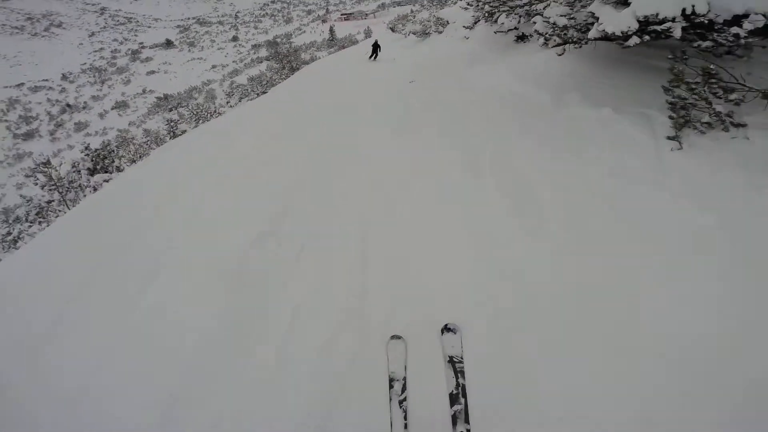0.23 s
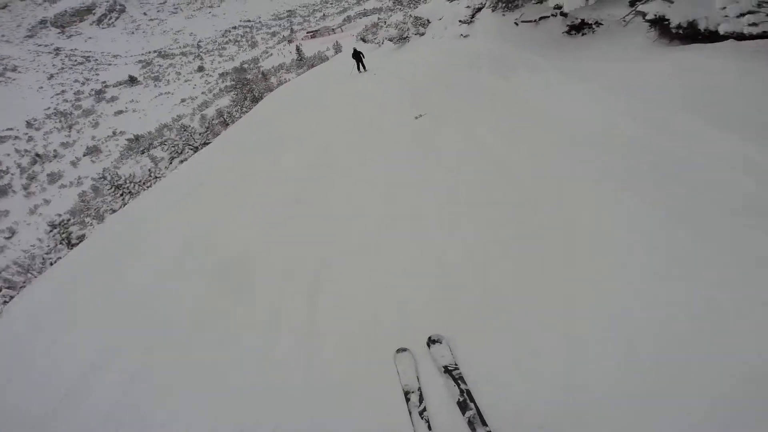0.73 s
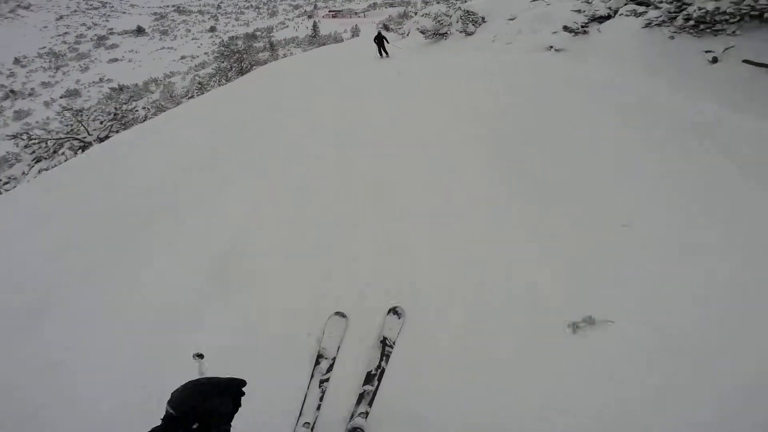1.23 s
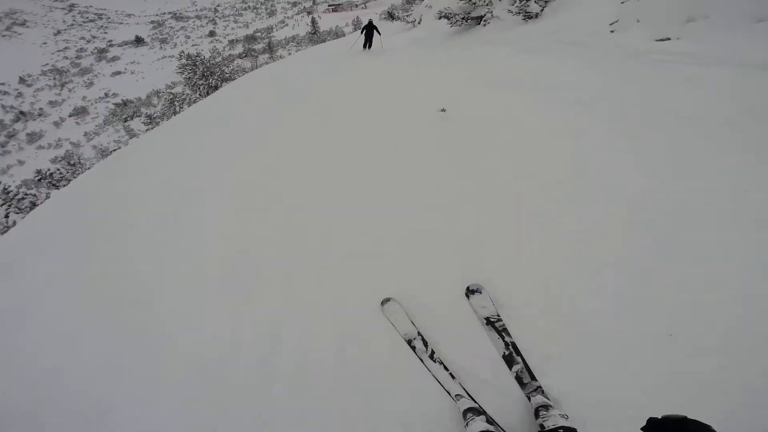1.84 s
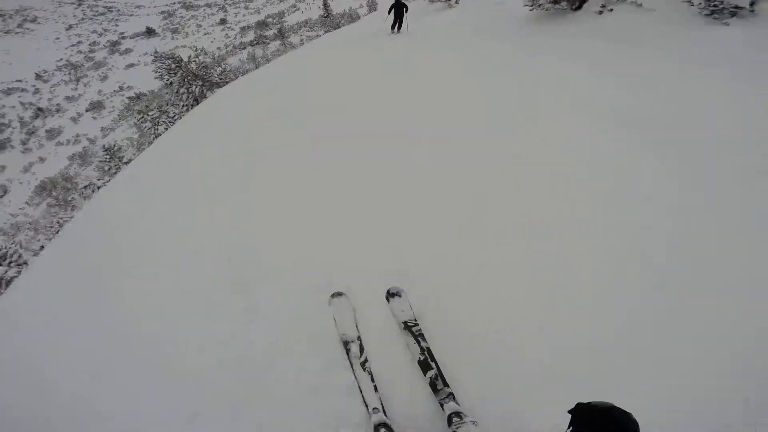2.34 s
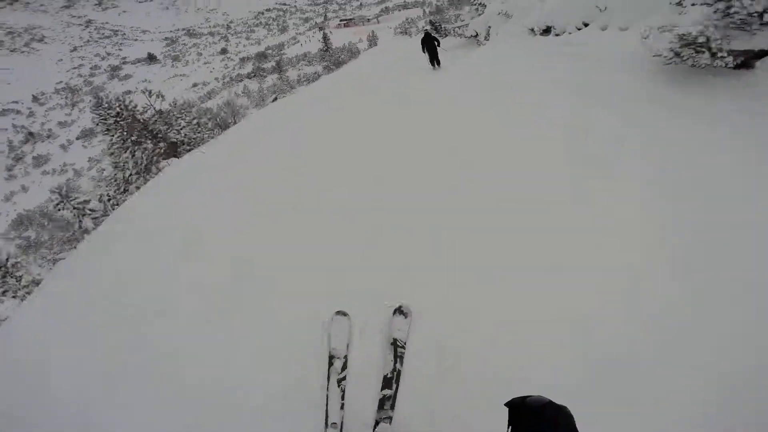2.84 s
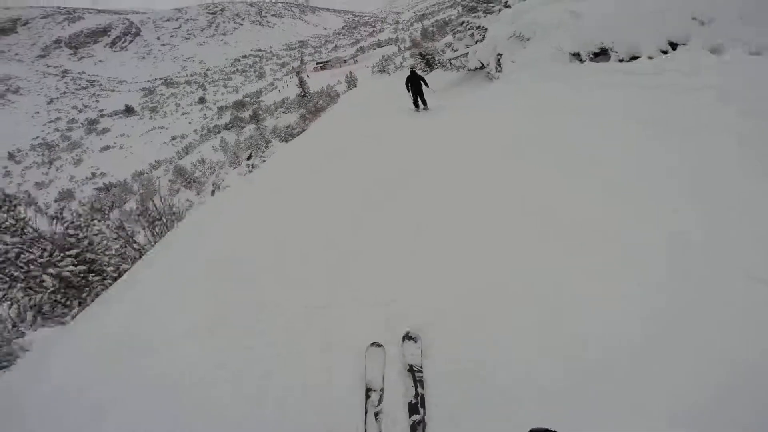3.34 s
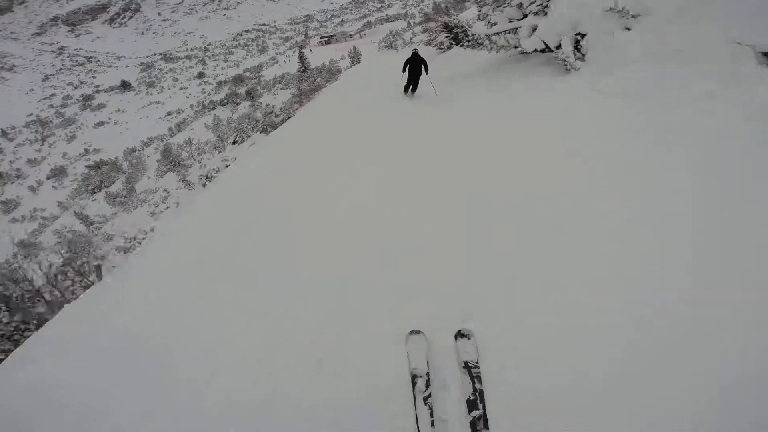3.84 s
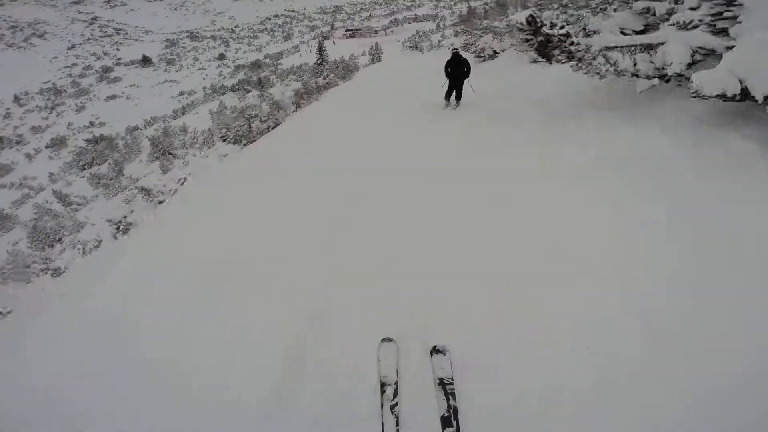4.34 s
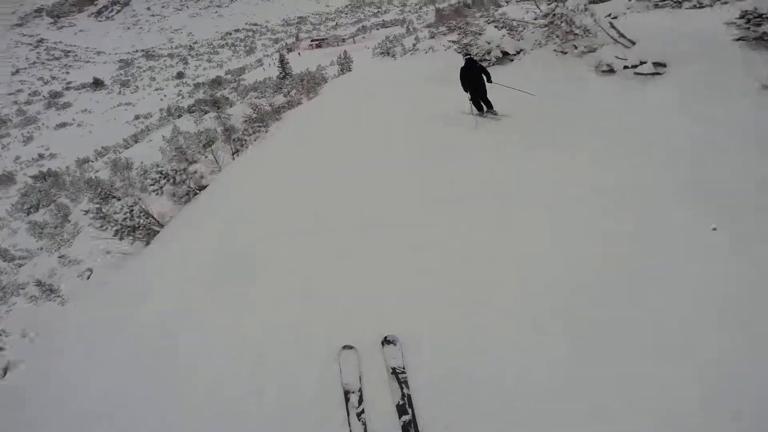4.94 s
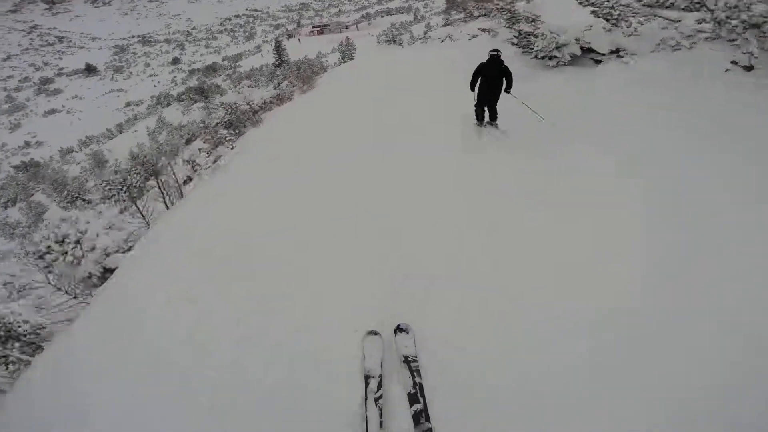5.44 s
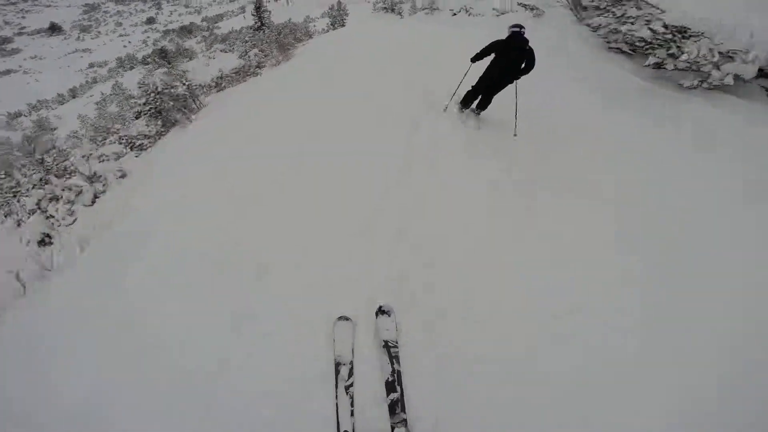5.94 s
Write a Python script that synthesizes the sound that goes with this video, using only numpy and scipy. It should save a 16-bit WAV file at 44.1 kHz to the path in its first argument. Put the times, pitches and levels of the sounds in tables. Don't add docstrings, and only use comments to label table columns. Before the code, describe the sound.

A skier glides down soft snow, heard close and boxed-in from a small sealed housing on the helmet. A grainy midrange hiss of skis runs throughout, swelling around 0.9 s, easing near 1.5, then surging and easing through later turns, with flickers as the skis bite or skip. Fine snow patters in short airy bursts, brightest around 2.0 to 2.8 s. Low wind rumbles and flutters unevenly beneath, strongest near 2 s; a very faint high electronic whine persists. Soft low bumps come at 1.2 and 1.9 s, a deeper one at 2.57, then a thump and hard helmet knock at 3.0 to 3.15. A sharp, loud crack snaps at 4.2 s, followed by two dull taps around 4.55. Low thuds at 5.3 lead to the heaviest jolt at 5.65: clattering knocks and a booming rebound, before gliding on beyond 6 s.

```python
import sys
import numpy as np
from scipy import signal
from scipy.io import wavfile
from scipy.ndimage import uniform_filter1d

SR = 44100
rng = np.random.default_rng(int(sys.argv[2]) if len(sys.argv) > 2 else 0)


def makeup_ratio(level_db):
    decades = np.asarray(level_db, float) / 20
    return 10 ** decades


def materialize(psi):
    bounded = np.clip(np.atleast_2d(psi).T, -1, 1)
    quanta = np.round(bounded * 32767).astype(np.int16)
    wavfile.write(sys.argv[1], SR, quanta)


N = 272979

# t/s, load level/dB, flatness of the ski/dB (favours the main mode)
SKI_LOAD = [(0, -52, 4), (.36, -48, 3), (.47, -45.5, 2.5), (.88, -41, 4.5), (1.45, -50.5, 2.5),
            (1.95, -46.5, 2.5), (2.27, -50.5, 3.5), (2.5, -44, -5), (2.85, -44, -1), (3.17, -51, 4.5),
            (3.45, -44.5, 6), (3.7, -49, 3), (4.4, -50, 2), (4.7, -44, 5.5), (4.92, -47.5, 4.5),
            (5.38, -43, 4.5), (5.75, -45.5, 3.5), (6.03, -51.5, 2)]


def evened(x):
    return x / np.sqrt(np.mean(x ** 2) + 1e-20)


def steadied(x, seconds):
    return evened(x / np.sqrt(uniform_filter1d(x ** 2, int(seconds * SR)) + .05))


def add(mix, s, sound):
    part = mix[round(s * SR):][:len(sound)]
    part += sound[:len(part)]


def column(table, index):
    rows = np.array(table)
    return np.interp(np.arange(N) / SR, rows[:, 0], rows[:, index])


def drift(top_hz):
    return evened(signal.lfilter(*signal.butter(2, top_hz, fs=SR), rng.standard_normal(N)))


def coloured(x, spectrum, patchy_db, size):
    hz, _, z = signal.stft(x, SR, nperseg=size, noverlap=size * 3 // 4)
    f, db = np.transpose(spectrum)
    patches = rng.standard_normal(z.shape[::-1]).T
    patches = uniform_filter1d(patches, size=6, axis=0)
    patches = evened(uniform_filter1d(patches, size=12, axis=1))
    shape_db = np.interp(np.log(hz + 1), np.log(f + 1), db, left=-120, right=-120)[:, None]
    shaped = z * makeup_ratio(shape_db + patchy_db * patches)
    return evened(signal.istft(shaped, nperseg=size, noverlap=size * 3 // 4)[1][:N])


def snow(crystals_per_s, spread_db, crunch, flutter_db):
    size_db = spread_db * np.minimum(rng.exponential(1, N), 4)
    breaks = (rng.random(N) < crystals_per_s / SR) * makeup_ratio(size_db)
    breaks *= rng.choice([-1., 1.], N)
    rub = rng.standard_normal(N) + crunch * evened(breaks)
    return rub * makeup_ratio(flutter_db * drift(41))


def ruts():
    # t/s, change of level/dB, half length/ms
    grips = [(.09, 2.5, 88), (.175, -7, 20), (.29, 1.5, 40), (.36, -4.5, 20), (1.04, 1, 16), (1.2, 3, 32),
             (1.28, 0, 21), (1.35, 2.5, 36), (1.43, -0.5, 23), (1.51, 2, 13), (1.645, 6, 18),
             (1.7, -1.5, 15), (1.81, -7.5, 28), (1.875, 0.5, 28), (2.06, 2.5, 43), (2.25, -3.5, 20),
             (2.93, -3.5, 30), (3.07, 1.5, 31), (3.185, -1.5, 20), (3.3, 1.5, 40), (3.75, 1.5, 30),
             (3.83, -0.5, 26), (4.11, 3, 73), (4.29, -1, 40), (4.5, 3, 14), (4.66, 3.5, 15), (5.025, 2, 30),
             (5.1, 0, 18), (5.37, 2, 18), (6.17, 5, 71)]
    t = np.arange(N) / SR
    return sum(db * np.exp(-((t - s) * 1000 / ms) ** 2) for s, db, ms in grips)


def load():
    return column(SKI_LOAD, index=1) + ruts() + 47


def glide():
    # f/Hz, level/dB per Hz
    main_mode = [(1000, -12), (1150, -20), (1350, -3), (1590, 1.5), (1670, -0.5), (1770, -10.5),
                 (2000, -21), (2200, -82)]
    upper_modes = [(1120, -50), (1900, -5), (2140, -2), (2520, 1.5), (3020, -3), (3350, -8.5), (3680, -10),
                   (3900, -23), (4200, -24), (5460, -62), (9240, -120)]
    main_bite = 1.38
    rub = snow(crystals_per_s=500, spread_db=-0.5, crunch=0.54, flutter_db=0.5)
    slow_db, flat_db = column(SKI_LOAD, index=1), column(SKI_LOAD, index=2)
    main_gain = makeup_ratio(slow_db + flat_db + main_bite * ruts())
    main = main_gain * coloured(rub, main_mode, patchy_db=1.0, size=1024)
    upper_gain = makeup_ratio(slow_db + ruts() + 0.19)
    return main + upper_gain * coloured(rub, upper_modes, patchy_db=0.92, size=512)


def plumes(hz):
    throws = [(.24, .08, -78, 7000), (.39, 0.2, -71, 7300), (.65, .55, -74, 5800), (1.15, .2, -67, 4400),
              (1.62, .07, -68, 6500), (1.9, 0.36, -66, 5170), (2.2, .155, -69, 5800),
              (2.0, .355, -72, 10500), (2.09, 0.2, -72, 10000), (2.13, 0.19, -61.5, 4400),
              (2.362, 0.52, -69.5, 5900), (3.0, 0.18, -68, 4400), (3.44, .16, -74, 7300),
              (3.8, .33, -72, 6960), (4.38, .12, -74, 7300), (4.55, .25, -76, 5800), (5.0, 0.16, -67, 4400),
              (5.2, 0.15, -73, 7000), (5.6, 0.21, -72, 6950)]
    rise_s, fall_s, width_octaves = 0.045, .015, 0.28
    t = np.arange(N) / SR
    power = np.zeros(N)
    for s, length, db, pitch in throws:
        nearness = np.exp(-(np.log2(hz / pitch) / width_octaves) ** 2)
        swell = np.clip(np.minimum((t - s) / rise_s, (s + length - t) / fall_s), 0, 1)
        power += makeup_ratio(db) ** 2 * nearness * swell
    return power


def spray():
    # f/Hz, level/dB per Hz
    coarse = [(3500, -30), (3900, -2.5), (4400, 3.5), (4700, -2), (5200, -3), (5500, -30)]
    sizzle = [(5000, -36), (5350, -1), (5900, 2.5), (6300, 0), (6700, -11), (7000, -28)]
    middle = [(6300, -31), (6700, 2.5), (7300, 7), (8000, -6), (8900, 0), (9300, -39)]
    fine = [(8600, -40), (9100, -3), (9700, -1.5), (11000, -11), (13400, -15), (14600, -3), (15200, -13),
            (15600, -35)]
    # centre f/Hz, level at mean load/dB, share of the load followed
    layers = [(4400, -70, 0.72), (5800, -72.5, 1.1), (7800, -80, .3), (10500, -81.5, .2)]
    # f/Hz, level/dB per Hz
    hiss = [(3300, -34), (3800, -6), (6000, -7), (8200, -12), (10800, -16.5), (12300, -14), (13500, -29),
            (14900, -17), (15150, -50)]
    dust = snow(crystals_per_s=300, spread_db=1.0, crunch=0.52, flutter_db=1.0)
    out = makeup_ratio(-68) * coloured(rng.standard_normal(N), hiss, patchy_db=0.8, size=512)
    for spectrum, (hz, db, share) in zip([coarse, sizzle, middle, fine], layers):
        level = np.sqrt(makeup_ratio(db + share * load()) ** 2 + plumes(hz))
        out += level * coloured(dust, spectrum, patchy_db=-2.0, size=512)
    return out


def wind():
    # t/s, level/dB
    gust_levels = [(0, -40), (.36, -45), (.65, -35), (.91, -47), (1.07, -35), (1.29, -35.5), (1.52, -38.5),
                   (1.95, -32), (2.31, -38.5), (2.88, -34.5), (3.21, -34.5), (3.52, -39.5), (4.45, -40.5),
                   (4.76, -45), (5.07, -41), (5.38, -37), (5.57, -41), (6.09, -37.5)]
    # f/Hz, level/dB per Hz
    buffet_band = [(8.8, -23), (15, -1), (53, -17), (65, -10.5), (81, -33.5), (110, -22), (140, -54),
                   (240, -120)]
    roar_band = [(56, -47), (95, -1.5), (123, -6), (166, 2.5), (205, -4.5), (248, -5.5), (319, -7.5),
                 (450, -13), (501, -13.5), (554, -17), (700, -26), (910, -28), (1540, -120)]
    rush_band = [(520, -30), (600, -5.5), (720, -3.5), (900, 2), (1100, -2), (1250, -0.5)]
    gusts = drift(9.9)
    buffet = coloured(rng.standard_normal(N), buffet_band, patchy_db=-1.8, size=4096)
    buffet = steadied(buffet * makeup_ratio(5.4 * gusts), 0.165)
    roar = coloured(rng.standard_normal(N), roar_band, patchy_db=1.17, size=2048)
    roar = steadied(roar * makeup_ratio(0.93 * gusts), 0.13)
    rush = coloured(rng.standard_normal(N), rush_band, patchy_db=1.6, size=1024) * makeup_ratio(0.53 * gusts)
    buffet_db = column(gust_levels, index=1) + 0.5
    roar_db = -42 + 0.2 * load() - 0.21 * column(SKI_LOAD, index=2) + 0.8
    rush_db = -55.5 + 0.57 * load()
    return makeup_ratio(buffet_db) * buffet + makeup_ratio(roar_db) * roar + makeup_ratio(rush_db) * rush


def whine():
    overtones = [(3, -74), (4, -80.5), (5, -81.3)]
    clock_hz, frames_per_s = 2926.4, 29.97
    since_frame = np.arange(N) / SR % (1 / frames_per_s)
    tones = np.zeros(N)
    for k, db in overtones:
        tones += np.sqrt(2) * makeup_ratio(db) * np.sin(2 * np.pi * k * clock_hz * since_frame)
    band = signal.firwin(401, [8000, 15000], pass_zero=False, fs=SR)
    return signal.oaconvolve(tones, band, "same")


def strikes(events, modes, low_hz):
    out, t = np.zeros(N), np.arange(2000) / SR
    high_pass = signal.butter(4, low_hz, "high", fs=SR, output="sos")
    for s, db, hard_db, ms in events:
        ring = np.zeros(len(t))
        for k, (hz, mode_db, t60) in enumerate(modes):
            decay_db = mode_db + hard_db * np.log2(hz / 1600) - 60 * t / t60
            ring += (-1) ** k * makeup_ratio(decay_db) * np.sin(2 * np.pi * hz * t)
        ring *= 1 - np.exp(-(t * 1000 / ms) ** 2)
        sound = signal.sosfilt(high_pass, ring)
        add(out, s, makeup_ratio(db) * sound / abs(sound).max())
    return out


def ticks():
    # f/Hz, level/dB, t60/s
    shell = [(1435, 4.5, 0.013), (1635, 2.5, 0.025), (2110, 0, 0.0078), (2580, -8.5, 0.021),
             (3160, -8, 0.015), (3850, -6.5, 0.011), (4390, -11.5, 0.007), (5650, -8, 0.0087),
             (6490, -16, 0.0031), (7600, -21, 0.0071), (8760, -22, 0.0051), (10050, -32, 0.0067),
             (11500, -32, 0.0043), (14000, -42, .003)]
    fleck = [(6400, 2, .005), (7700, -1, .005), (9900, -1, .004), (13800, -12, .003)]
    helmet = [(326, -7, 0.011), (628, -9, 0.0089), (1030, -5, 0.0047), (1460, -7.5, 0.012),
              (1840, -4.5, 0.0041), (2216, -1, 0.0078), (3080, -12.5, 0.005), (4360, -14.5, 0.0031),
              (6040, -26.5, 0.0035), (8200, -45, .004), (11100, -47, .004)]
    # t/s, peak level/dB, hardness/dB per octave, contact time/ms
    taps = [
        (.381, -30, -12, 1.2),
        (.5185, -32.5, 3, .4),
        (2.423, -39, 9, 1.2),
        (2.455, -31.5, -2, .8),
        (3.999, -33, -4, .8),
        (4.2153, -6, 4, 0.093),
        (4.545, -28, -8, 0.89),
        (4.603, -26, -9, 0.99),
    ]
    flecks = [
        (2.165, -43, .3, 0.48),
        (2.349, -48, 14, .2),
        (1.495, -60, 6, .4),
        (5.24, -54, 1, .4),
        (5.652, -46, 5, .3),
        (5.668, -48, .3, .4),
        (5.695, -46, 6, .4),
    ]
    knocks = [(.522, -39, 3, .6), (1.51, -37, 5, .6), (4.259, -41, 11, .6), (2.537, -30, -6, .8),
              (2.993, -31, -3, 0.95), (3.047, -35, -6, 0.97), (3.1485, -13.5, 3.5, 1.7),
              (5.6515, -10.5, 5, 0.56), (5.654, -13, 0, 0.37), (5.656, -18, -7, 1), (5.666, -14.5, -2, .8),
              (5.669, -16, 4, 0.75), (5.70, -18, -1.5, 0.72)]
    small = strikes(taps, shell, low_hz=1150) + strikes(flecks, fleck, low_hz=4000)
    return small + strikes(knocks, helmet, low_hz=145)


def mount():
    # t/s, peak level/dB, ring f/Hz, half length/ms
    bumps = [(0.61, -24, 52.7, 53), (1.214, -20, 52.7, 13), (1.43, -25, 38.4, 12), (1.561, -29.8, 51.3, 43),
             (1.779, -33.3, 54.7, 15), (1.94, -18.5, 43.4, 21), (3.013, -14.5, 40.6, 12.5),
             (3.1508, -13, 106, 2.7), (3.165, -13, 45, 7.6), (3.83, -25.5, 40, 8.3), (5.032, -26, 53.5, 35),
             (5.227, -24, 25, 17), (5.343, -17.5, 52.8, 28), (5.665, -2.3, 63, 9.7), (5.99, -26, 38.8, 11),
             (6.048, -33, 45, 22)]
    hollows = [(1.264, -21, 47, 16), (1.991, -29.5, 51.5, 36), (2.521, -19, 39, 22), (2.568, -9.5, 42, 13),
               (2.599, -21, 65, 11.7), (3.065, -20, 41, 12), (3.27, -20, 44, 6.4), (3.442, -26, 46, 20),
               (4.475, -22.5, 41, 12.4), (4.779, -27, 47.4, 24), (5.31, -13.7, 45, 13.7),
               (5.659, -6, 121, 1.7), (5.679, -10, 100, 5.9)]
    # t/s, level/dB, ring f/Hz, t60/s, direction
    blows = [
        (5.651, -5, 111, 0.052, -0.93),
        (5.684, -7.5, 43.3, 0.11, 1),
        (5.706, -6, 51.2, 0.21, 0.89),
    ]
    out, t = np.zeros(N), np.arange(-4410, 4410) / SR
    for way, events in [(1, bumps), (-1, hollows)]:
        for s, db, hz, ms in events:
            swell = np.exp(-(t * 1000 / ms) ** 2)
            add(out, s + t[0], way * makeup_ratio(db) * swell * np.cos(2 * np.pi * hz * t))
    t = np.arange(SR // 3) / SR
    onset = 1 - np.exp(-t / 0.00032)
    for s, db, hz, t60, way in blows:
        add(out, s, way * makeup_ratio(db - 60 * t / t60) * onset * np.sin(2 * np.pi * hz * t))
    return out


def scene():
    return (glide() + spray() + wind() + whine() + ticks() + mount())[None]


def band_limit(x):
    return signal.sosfilt(signal.butter(12, 15080, fs=SR, output="sos"), x)


def record(dry):
    return band_limit(dry)


dry = scene()
out = record(dry)
materialize(out)
```